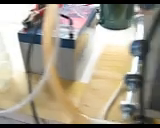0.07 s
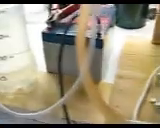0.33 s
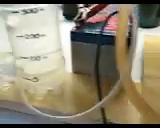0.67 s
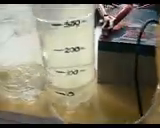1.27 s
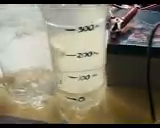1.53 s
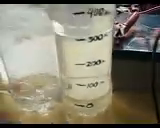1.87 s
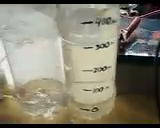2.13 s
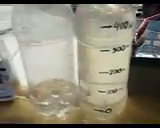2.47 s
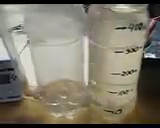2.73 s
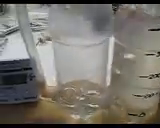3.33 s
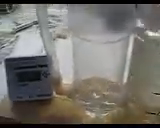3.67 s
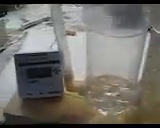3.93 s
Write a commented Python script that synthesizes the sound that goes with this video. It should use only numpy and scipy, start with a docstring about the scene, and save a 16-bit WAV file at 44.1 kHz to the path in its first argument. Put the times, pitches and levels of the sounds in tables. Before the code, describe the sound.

Water churning with bubbles, glugs and small pops over a clattering, idling engine.

```python
"""Gas bubbles through water in plastic jars on a workbench while an engine idles close by.
The engine drones and clatters; it shudders now and then, and past the middle settles at a slightly faster idle.
The jars churn and fizz, with a few larger glugs and sharp little pops on top."""
import sys
import numpy as np
from scipy import signal
from scipy.fft import rfft, irfft
from scipy.io import wavfile

SR = 44100
rng = np.random.default_rng(int(sys.argv[2]) if len(sys.argv) > 2 else 0)


def waveform_to_disk(signal):
    """Save audio, clipped to [-1, 1], as 16-bit WAV at the path in sys.argv[1]."""
    frames = np.transpose(np.atleast_2d(signal))
    scaled = np.clip(frames, -1, 1) * 32767
    samples = np.round(scaled).astype(np.int16)
    wavfile.write(sys.argv[1], SR, samples)


N = 176400

# engine speed: (s, turns per second)
SPEED = [(0, 11.47), (.7, 11.6), (1.05, 11.54), (1.85, 11.65), (2.27, 11.6), (2.35, 11.45), (2.47, 12.04), (2.7, 12.05), (3.45, 11.97), (4, 11.98)]  # fixed
SETTLES_S, SETTLING_S = 2.54, 0.37   # the change from slow to fast idle
# drone: (multiple of the speed, dB at slow idle, dB at fast idle)
ORDERS = [(3, -47.5, -57), (7, -55.5, -64.5), (9, -42.5, -37), (15, -62.5, -43.5), (20, -41.5, -44.5), (23, -51, -47), (24, -41, -43.5), (26, -44.5, -47.5),
          (30, -45.5, -41.5), (33, -52.5, -51.5), (39, -51.5, -46), (42, -55.5, -55), (45, -49, -53.5), (47, -54.5, -38.5), (48, -40, -44), (50, -49, -57), (51, -45.5, -53.5),
          (54, -42, -44.5), (63, -53, -46.5), (69.43, -43, -47.5), (72.38, -40.5, -39.5), (75.7, -49.5, -45), (80.6, -40.5, -42.5), (85.5, -46, -50), (87.1, -48.5, -44.5), (91.5, -38.5, -46), (99.9, -49, -59), (113, -47, -46.5)]
BOOM_ORDER = 10  # fixed
# level of the strongest drone note: (s, dB)
BOOM = [(0, -29), (.7, -31), (.8, -36.5), (.88, -40), (1, -27.5), (1.45, -30.5), (1.7, -35.5), (2.2, -37.5), (2.6, -35), (3.3, -43), (4, -31.5)]
HUM_HZ = 53.8  # fixed
HUM_DB = -41   # a steady low hum beside the engine
# shudders: (s, length s, level dB)
SHUDDERS = [(.765, 0.029, -23.5), (.875, 0.02, -28), (1.002, 0.068, -31.5), (2.343, 0.054, -24), (3.905, 0.04, -26.5)]
SHUDDER_COLOUR = [(20, -13), (40, 2), (75, 3), (125, 1.5), (170, -4.5), (240, 1), (400, -11), (1000, -16), (2000, -27.5), (3500, -28.5), (6000, -52)]   # (Hz, dB per Hz)
CONTACT_JITTER_S, CONTACT_SPREAD_DB, CONTACT_CHANGE = .00006, 1.5, 0.53   # looseness of the moving parts
THROB, THROB_SIX = 0.05, 0.16   # depth of the beat at three and six to the turn
CLATTER_DB = -31.5
CLATTER = [(60, -26.5), (160, -12), (240, -3.5), (320, -2), (400, -11), (560, -4), (720, 0), (900, -0.5), (1050, -3), (1130, -8.5), (1380, -5), (1470, -16), (2000, -9.5), (2800, -15.5), (3500, -25.5), (6500, -52.5)]   # (Hz, dB per Hz)
MIDS = [(0, -27), (.7, -28.5), (1.3, -28.5), (1.8, -27), (2.3, -27.5), (2.8, -28), (3.2, -30), (3.6, -28), (4, -27.5)]   # level of the middle range: (s, dB)
RUMBLE_DB = -34.5
RUMBLE = [(12, -32.5), (25, -6.5), (40, -2), (62, 0), (82, 7.5), (97, -6), (138, 5), (156, -24), (185, 0), (240, 4), (400, -5.5), (700, -0.5), (1200, -2), (2500, -49.5)]   # (Hz, dB per Hz)
FIZZ = [(500, -10.5), (1000, 1), (1500, 0.5), (2020, -1.5), (2250, 0.5), (2480, -1), (2900, -4.5), (3400, -6.5), (4350, -8.5), (4560, -8), (4850, -13), (5200, -14), (5800, -21), (6400, -30), (7000, -50)]   # (Hz, dB per Hz)
BUBBLES_DB, BUBBLES_PER_S, BUBBLE_CYCLES, BUBBLE_SPREAD_DB = -34, 900, 16.4, 1
BUBBLE_LOW_HZ, BUBBLE_HIGH_HZ = 473, 1097
# large bubbles break: (s, peak dB, pitch Hz)
GLUGS = [(.176, -19, 780), (.256, -19.5, 660), (.328, -19, 640), (.414, -16.5, 645), (.958, -23.5, 746), (1.078, -19, 595), (1.114, -15.5, 544), (1.168, -17, 600), (1.25, -13.5, 663),
         (1.467, -21, 1090), (1.606, -14.5, 983), (2.019, -15, 602), (3.075, -12.5, 690), (3.274, -16.5, 656), (3.366, -15.5, 653), (3.503, -17, 890), (3.972, -17, 876)]
JAR = [(490, -2.5, 0.04), (660, 1, 0.022), (779, -1, 0.024), (1010, -2.5, 0.031)]   # modes of the jar: (Hz, dB, t60 s)
# small bubbles pop: (s, pitch Hz, ring dB, t60 s, splash dB)
POPS = [(.329, 1850, -16.5, 0.037, -44), (1.113, 5150, -35, .015, -28.5), (1.728, 5050, -28.5, 0.022, -24), (2.024, 5430, -35, 0.016, -38), (3.076, 2100, -8.5, 0.013, -35),
        (3.101, 3820, -20, 0.011, -39), (3.117, 4700, -38, .008, -29), (3.57, 3660, -23.5, 0.022, -44), (3.8708, 3600, -15, .008, -24), (3.9395, 2310, -4.5, 0.01, -44)]
CUTOFF_HZ = 6650  # fixed
TIME = np.arange(N) / SR
# strength of the fizz: (s, dB)
FIZZ_LEVEL = [(0, -36.5), (.6, -35), (.77, -34), (.92, -37.5), (1.4, -35), (1.9, -36.5), (2.45, -36), (2.65, -35.5), (2.9, -36), (3.3, -36), (4, -36.5)]
FIZZ_DB = None
FIZZ_PER_S, FIZZ_SPREAD_DB = 16000, 2.25
GLUG_S, GLUG_RATTLE_PER_S = None, None
POP_RISE_PER_S, POP_ATTACK_S, SPLASH_S = 3, .0006, 0.0022
SPLASH_DB = None
SPLASH = [(800, -18), (2500, -6), (3600, -6), (4600, 10), (5900, -3), (7000, -20), (9000, -35.5)]   # (Hz, dB per Hz)
KNOCK_DB, KNOCK_HZ, KNOCK_T60_S = -2.5, 760, .006   # the first dull knock of a glug
GLUG_RING_DB, GLUG_T60_S = -5.5, 0.056   # the bubble's own note
FLURRY_DB, FLURRY_S, FLURRY_PER_S = -8, 0.015, 2500   # the short dying churn after it
# hard surfaces close to the jars: (delay s, level dB)
REFLECTIONS = [(.0029, -17.5), (.0061, -17), (0.011, -17.5), (.019, -16)]
ROOM_T60_S = 0.15
WATER_MUFFLE_HZ = 1820
# level of a narrow hiss of escaping gas: (s, dB)
HISS_LEVEL = [(0, -52), (1.2, -49.5), (1.7, -42), (2.4, -46.5), (2.65, -38.5), (2.95, -52), (4, -49)]
HISS = [(1800, -29), (2400, -2.5), (2750, 0), (3050, -2.5), (3400, -15.5), (4350, -16.5), (4580, -4), (4800, -19), (6500, -42.5)]   # (Hz, dB per Hz)
# level of the engine's higher notes: (s, dB)
WHINE = [(0, -5.5), (.6, -2), (1.2, -2), (1.7, 1), (2.2, 1.5), (2.7, 1), (3.3, -1), (4, 1.5)]
WHINE_FROM_ORDER = 39  # fixed


def from_db(db):
    """Decibels to gain."""
    return 10 ** (np.asarray(db) / 20)


def rms_one(x):
    """Scale to unit power."""
    return x / np.sqrt(np.mean(x ** 2) + 1e-20)


def in_time(rows):
    """Join (s, value) points by straight lines."""
    return np.interp(TIME, *np.transpose(rows))


def coloured(x, spectrum):
    """Give a dense sound a smooth spectrum; unit power."""
    hz, db = np.transpose(spectrum)
    bins = np.maximum(np.fft.rfftfreq(N, 1 / SR), 1)
    return rms_one(irfft(rfft(x) * from_db(np.interp(np.log(bins), np.log(hz), db)), N))


def ring(clicks, hz, t60):
    """A unit click sets a sine of height 1 ringing."""
    r, w = np.exp(-np.log(1000) / (t60 * SR)), 2 * np.pi * hz / SR
    return signal.lfilter([0, np.sin(w)], [1, -2 * r * np.cos(w), r * r], clicks + 1e-18)


def clicks_at(s, sizes):
    """Single clicks at given times."""
    inside = (s >= 0) & (s < (N - 1) / SR)
    return np.bincount((s[inside] * SR).astype(int), sizes[inside], N)


def grains(per_s, spread_db):
    """Random clicks, mostly small."""
    sizes = from_db(spread_db * np.minimum(rng.exponential(1, N), 5)) * rng.choice([-1, 1], N)
    return sizes * (rng.random(N) < per_s / SR)


def drone(turns):
    """Engine notes locked to the shaft, rebalanced as the idle changes, and the steady hum."""
    fast = np.clip((TIME - SETTLES_S) / SETTLING_S + .5, 0, 1)
    whine_db = in_time(WHINE)
    notes = [(round(k) * turns, slow_db + (fast_db - slow_db) * fast + whine_db * (k >= WHINE_FROM_ORDER)) for k, slow_db, fast_db in ORDERS]
    notes += [(BOOM_ORDER * turns, in_time(BOOM)), (HUM_HZ * TIME, HUM_DB)]
    return np.sqrt(2) * sum(from_db(db) * np.sin(2 * np.pi * (cycles + rng.random())) for cycles, db in notes)


def clatter(turns, count=400):
    """The same small contacts return every two turns, never quite alike, throbbing with the firings."""
    place = rng.random(count)
    size = from_db(CONTACT_SPREAD_DB * rng.standard_normal(count)) * rng.choice([-1, 1], count)
    cycle = np.arange(int(turns[-1] / 2) + 1)[:, None]
    jitter, change = rng.standard_normal((2, len(cycle), count))
    s = np.interp(2 * (cycle + place), turns, TIME, right=-1) + CONTACT_JITTER_S * jitter
    firing = 2 * np.pi * 3 * turns  # fixed
    throb = 1 + THROB * np.cos(firing) + THROB_SIX * np.cos(2 * firing)
    return from_db(CLATTER_DB) * throb * coloured(room(clicks_at(s, size * (1 + CONTACT_CHANGE * change))), CLATTER)


def rumble():
    """The engine's low rush, swelling at each shudder."""
    swell = sum(from_db(db) * np.exp(-.5 * ((TIME - s) / length) ** 2) for s, length, db in SHUDDERS)
    return from_db(RUMBLE_DB) * coloured(rng.standard_normal(N), RUMBLE) + swell * coloured(rng.standard_normal(N), SHUDDER_COLOUR)


def churn(count=20):
    """A stream of bubbles, each ringing for a few cycles at its own pitch."""
    born, dealt = grains(BUBBLES_PER_S, BUBBLE_SPREAD_DB), rng.integers(0, count, N)
    pitches = np.geomspace(BUBBLE_LOW_HZ, BUBBLE_HIGH_HZ, count)
    return from_db(BUBBLES_DB) * rms_one(sum(ring(born * (dealt == k), hz, BUBBLE_CYCLES / hz) for k, hz in enumerate(pitches)))


def fizz():
    """Countless tiny bursts merge into a hiss."""
    return from_db(in_time(FIZZ_LEVEL)) * coloured(grains(FIZZ_PER_S, FIZZ_SPREAD_DB), FIZZ)


def glugs():
    """A large bubble knocks, rings at its own pitch and churns the water against the jar's wall."""
    out, strength = 0, 0
    for s, db, hz in GLUGS:
        click = clicks_at(np.array([s]), from_db([db]))
        out = out + from_db(GLUG_RING_DB) * ring(click, hz, GLUG_T60_S) + from_db(KNOCK_DB) * ring(click, KNOCK_HZ, KNOCK_T60_S)
        strength = strength + from_db(db + FLURRY_DB) * (TIME >= s) * np.exp(-np.abs(TIME - s) / FLURRY_S)
    wall = sum(from_db(db) * ring(grains(FLURRY_PER_S, spread_db=1), hz, t60) for hz, db, t60 in JAR)
    return signal.sosfilt(signal.butter(2, WATER_MUFFLE_HZ, fs=SR, output="sos"), strength * rms_one(wall) - out)


def pops():
    """A film snaps with a tiny splash and the cavity rings, rising in pitch."""
    out, t = np.zeros(N + SR), TIME[:SR // 20]
    spray = coloured(rng.standard_normal(N), SPLASH)
    for k, (s, hz, db, t60, splash_db) in enumerate(POPS):
        tone = from_db(db) * np.sin(2 * np.pi * hz * (t + POP_RISE_PER_S * t * t / 2)) * np.exp(-np.log(1000) * t / t60)
        splash = from_db(splash_db) * spray[k * len(t):(k + 1) * len(t)] * np.exp(-t / SPLASH_S)
        start = int(s * SR)
        out[start:start + len(t)] += (tone + splash) * (1 - np.exp(-t / POP_ATTACK_S))
    return out[:N]


def room(x):
    """The walls add a short diffuse tail as strong as the direct sound."""
    t = TIME[:SR // 3]
    tail = rng.standard_normal(len(t)) * np.exp(-np.log(1000) * t / ROOM_T60_S)
    return x + signal.fftconvolve(x, tail / np.linalg.norm(tail))[:N]


def bench(x):
    """A few early reflections ripple the spectrum; the power stays the same."""
    echoes = sum(from_db(db) * np.interp(TIME - delay, TIME, x, left=0) for delay, db in REFLECTIONS)
    return (x + echoes) / np.sqrt(1 + sum(from_db(db) ** 2 for delay, db in REFLECTIONS))


def hiss():
    """Gas leaks past the tubing with two soft resonances."""
    return from_db(in_time(HISS_LEVEL)) * coloured(rng.standard_normal(N), HISS)


def scene():
    """Engine and jars, heard from just above the bench."""
    turns = np.cumsum(in_time(SPEED)) / SR
    mids_db = in_time(MIDS)
    middle = from_db(mids_db - mids_db.mean()) * (clatter(turns) + churn())
    return (drone(turns) + rumble() + middle + bench(fizz() + hiss()) + glugs() + pops())[None]


def record(dry):
    """A small microphone with a narrow band."""
    return signal.sosfilt(signal.cheby1(14, .1, CUTOFF_HZ, fs=SR, output="sos"), dry)


dry = scene()
out = record(dry)
waveform_to_disk(out)
```